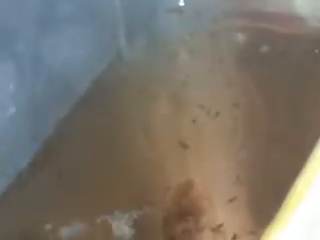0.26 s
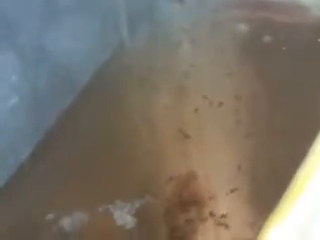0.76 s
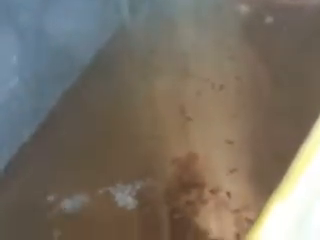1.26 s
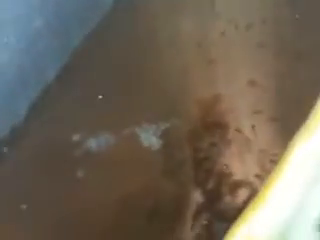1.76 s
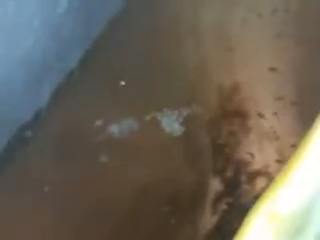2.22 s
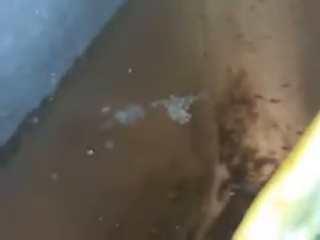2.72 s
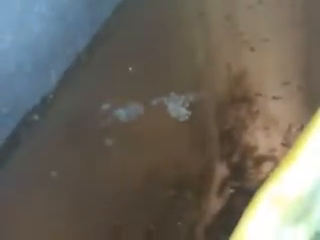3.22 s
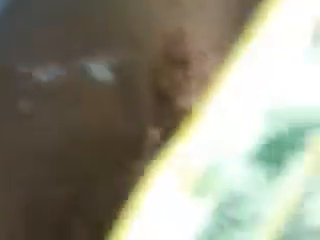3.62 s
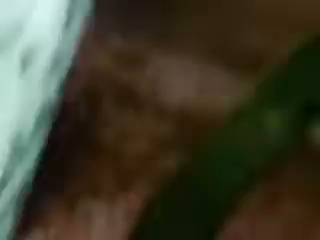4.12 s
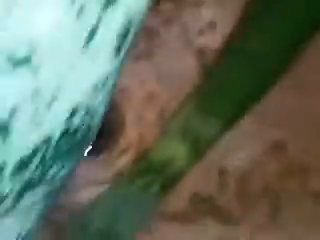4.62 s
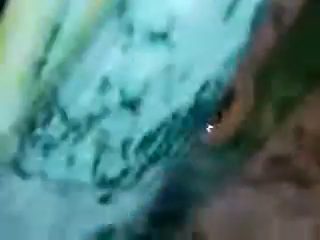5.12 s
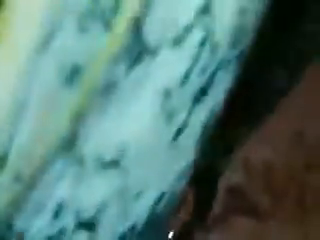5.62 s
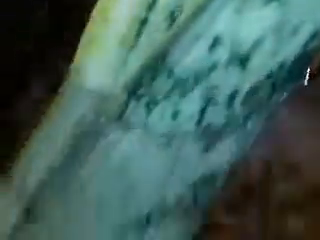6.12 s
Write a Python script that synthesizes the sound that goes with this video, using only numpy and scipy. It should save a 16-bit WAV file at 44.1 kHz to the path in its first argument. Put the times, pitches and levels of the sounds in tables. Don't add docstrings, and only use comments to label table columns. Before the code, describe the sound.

Close to a water tank, a pump hums without pause at a low, buzzy pitch while air rushes through ducts with a thin, fluttering whistle. Faint treble rustles come from a hand on the phone. It turns near four seconds with slight finger scuffs and a soft thud, the hum dipping a little. Later a hollow tub is bumped, rebounding quickly, then a dull double thud follows. A phone microphone with little treble captures it.

```python
import sys
import numpy as np
from scipy import signal
from scipy.fft import irfft, dct, next_fast_len
from scipy.io import wavfile
from scipy.ndimage import uniform_filter1d, map_coordinates

SR = 44100
rng = np.random.default_rng(int(sys.argv[2]) if len(sys.argv) > 2 else 0)


def wav_out(sig):
    wavfile.write(sys.argv[1], SR, np.round(np.clip(np.atleast_2d(sig).T, -1, 1) * 32767).astype(np.int16))


def voltage_ratio(level):
    return 10 ** (np.asarray(level, float) / 20)


N = 280476
TIME_S = np.arange(N) / SR
CONTROL_S = np.arange(0, N + 64, 64) / SR
HOP, GRID = 2048, 536

# (time [s], level of the main hum [dB], turn of the phone [0-1])
PHONE_PATH = [
    (0, -38, 0.1),
    (1.5, -38.5, 0.21),
    (3.4, -37, 0),
    (3.8, -39, 0.32),
    (4.25, -42, 0.99),
    (5.0, -40.5, 0.97),
    (5.6, -39.5, 0.98),
    (6.36, -38.5, 0.64),
]


def curve(table, column):
    rows = np.array(table, float)
    return np.interp(CONTROL_S, rows[:, 0], rows[:, column])


def walk(rate):
    place = CONTROL_S * rate
    whole = place.astype(int)
    part = place - whole
    blend = part ** 2 * (3 - 2 * part)
    levels = rng.standard_normal(whole[-1] + 2)
    return 1.3 * (levels[whole] * (1 - blend) + levels[whole + 1] * blend)


def fader(db):
    return np.interp(TIME_S, CONTROL_S, voltage_ratio(db))


def fading(t, t60):
    return np.exp(-np.log(1000) * t / t60)


def noise(gain):
    size = next_fast_len(N, True)
    hz = np.maximum(np.fft.rfftfreq(size, 1 / SR), 1)
    chance = rng.standard_normal(len(hz)) + 1j * rng.standard_normal(len(hz))
    return irfft(chance * gain(hz) * np.sqrt(size * SR) / 2, size)[:N]


def ring(centre_hz, width):
    x = noise(lambda hz: 1 / (1 + (2 * (hz - centre_hz) / width) ** 2))
    return x / x.std()


def hum(shaft):
    # (multiple of the shaft rate, level [dB rms], change once the phone has turned [dB])
    shaft_orders = [(4, -65.1, -3.0), (5, -55.8, -1.5), (6, -38.6, -2.5), (7, -58.1, 1.5), (8, -52.1, 0.5),
                    (9, -63.5, -5.5), (10, -58.4, 3.5), (11, -57.1, -0.5), (12, -55.3, 0.5),
                    (13, -58.6, -2.0), (14, -52.6, -1.0), (15, -53.0, -1.5), (16, -51.2, -3.0),
                    (17, -54.8, -3.0), (18, -56.7, -1.5), (19, -61.4, -3.0), (20, -59.3, -1.0),
                    (21, -60.9, 1.0), (22, -54.0, -4.0), (23, -59.6, -3.5), (24, -60.2, -3.5),
                    (26, -63.2, -5.5), (27, -61.7, -1.5), (28, -56.2, 0.0), (29, -60.6, -3.0),
                    (32, -59.2, 0.5), (33, -66.9, 1.5), (34, -58.8, -4.5), (36, -62.6, -0.5),
                    (38, -58.9, 0.5), (41, -56.4, -6.5), (42, -65.2, -0.5), (43, -55.0, -5.0),
                    (60, -57.7, -3.0), (62, -57.1, -6.5), (63, -61.2, -9.5), (67, -64.0, 0.5),
                    (69, -62.6, 1.0)]
    main_order, main_order_db, main_phase_rad = 6, -38.6, 2.07
    mains_line_db, weak_orders_db = -69, -73.5
    mains_knock, shaft_knock = (.62, -2.8), (.1, -1.6)
    knock_scatter_rad = 2.2

    main_db = curve(PHONE_PATH, column=1) - main_order_db
    turned = curve(PHONE_PATH, column=2)
    strong = {}
    for order, db, change_db in shaft_orders:
        strong[round(order)] = db + (order != main_order) * change_db * turned

    one_turn = np.exp(1j * shaft)
    spin = one_turn ** 3
    lines = np.sqrt(2) * voltage_ratio(mains_line_db) * np.sin(2 * shaft)
    for order in range(4, 70):
        spin = spin * one_turn
        lead, phase = shaft_knock if order % 2 else mains_knock
        phase = phase + lead * order + knock_scatter_rad * (rng.random() - .5)
        if order == main_order:
            phase = main_phase_rad
        line = np.sqrt(2) * np.imag(spin * np.exp(1j * phase))
        if order == main_order:
            main = line * fader(strong[order] + main_db + 0.16 * walk(0.72))
        elif order in strong:
            lines = lines + line * fader(strong[order] + 0.22 * walk(1.5))
        else:
            weak_db = weak_orders_db - 2.9 * np.log2(order / 26) + 2.3 * rng.standard_normal()
            lines = lines + line * voltage_ratio(weak_db)
    return main + lines


def rush(shaft):
    # (frequency [Hz], level [dB per Hz])
    air_spectrum = [(30, -87), (95, -79.5), (200, -72), (480, -71), (640, -78), (760, -81.5), (880, -79.5),
                    (1120, -77.5), (1280, -80), (1600, -72.5), (2300, -76), (3000, -79), (4150, -87),
                    (4750, -93), (5200, -103)]
    points = np.array(air_spectrum, float)
    turned, swell = curve(PHONE_PATH, column=2), walk(1.2)
    low_db, high_db = -1.5 * turned, 0.75 * turned
    out = 0
    for centre in np.arange(4, 13, .5):

        def band_gain(hz):
            level_db = np.interp(np.log(hz), np.log(points[:, 0]), points[:, 1])
            return voltage_ratio(level_db) * np.cos(np.pi * np.clip(np.log2(hz) - centre, -.5, .5))

        place_db = low_db if centre < 9.4 else high_db
        flicker_db = 3.0 if centre < 6.8 else .6
        out = out + noise(band_gain) * fader(place_db + 0.23 * swell + flicker_db * walk(5))
    return out * (1 + 0.063 * np.cos(2 * shaft))


def drifting(x):
    slip = np.cumsum(np.interp(TIME_S, CONTROL_S, .008 * walk(2.5)))
    return map_coordinates(x, [np.arange(N) + slip], order=1, mode="mirror")


def steadied(x):
    size = np.sqrt(uniform_filter1d(x ** 2, size=SR // 50)) + 0.19
    x = x / size ** .85
    return x / x.std()


def gusts(column):
    # (time of the crest [s], rise of the lower tone [dB], rise of the upper tone [dB])
    gust_crests = [(.12, 6, 4), (.26, 12, 5.9), (.65, 3.8, 2), (.92, 5.3, 9.9), (1.25, 9.4, 6),
                   (1.35, 7.1, 11.4), (1.45, 6, 7.6), (1.68, 4.1, 1.3333), (1.92, 5.6, 2), (2.1, 5.6, 1.8),
                   (2.3, 7.5, 5.6), (2.42, 7.1, 6.5), (2.8, 6.4, 9.9), (2.95, 1.9, 6.1), (3.34, 8.7, 6),
                   (3.75, 5.7, 4.5), (3.9, 10, 7.5), (4.201, 7.4, 6), (4.58, 0.6, 1.8), (4.96, 7.8, 5),
                   (5.2, 1.5, 4), (6.36, 4.3, 7.2)]
    rise_s, fall_s = 0.037, 0.05
    out = 0
    for crest, db in np.array(gust_crests)[:, [0, column]]:
        t = CONTROL_S - crest
        distance = np.where(t < 0, -t / rise_s, t / fall_s)
        out = np.maximum(out, db * np.exp(-distance ** 2))
    return out


def ducts(shaft):
    # (frequency [Hz], width [Hz], level [dB rms], change once the phone has turned [dB])
    duct_modes = [(361, 76, -59.5, -3.5), (941, 120, -56, 4), (1041, 120, -52.5, -4.5),
                  (1544, 84, -56.5, 2.5), (1760, 230, -64, 12.5), (1877, 22, -54, -1),
                  (2065, 100, -53.5, 3), (2438, 160, -57.5, 4), (2608, 120, -52, -3),
                  (2810, 360, -49, -12.5)]
    # (frequency [Hz], width [Hz], level [dB])
    whistle_tones = [
        (1797, 9, -4.5),
        (1840, 20, -5),
    ]
    whistle_rest_db = -49.5
    turned = curve(PHONE_PATH, column=2)
    out = 0
    for hz, width, db, turned_db in duct_modes:
        out = out + drifting(ring(hz, width)) * fader(db + turned_db * turned + 1.5 * walk(3.0))
    for k, (hz, width, db) in enumerate(whistle_tones):
        out = out + steadied(ring(hz, width)) * fader(db + whistle_rest_db + gusts(column=k + 1))
    return out * (1 + 0.14 * np.cos(2 * shaft))


def bump():
    # (time [s], level [dB])
    tub_blows = [
        (5.647, -12.5),
        (5.662, -17),
        (5.673, -14.5),
        (5.703, -20),
        (5.734, -26),
        (5.771, -29),
        (5.798, -28),
    ]
    # (frequency [Hz], level [dB], time to fade by 60 dB [s])
    tub_modes = [
        (273, -1.5, 0.052),
        (305, -8.5, 0.025),
    ]
    # (frequency [Hz], level [dB], time to fade by 60 dB [s])
    tub_air = (258, -34.5, 0.8)
    out, t = np.zeros(N), np.arange(SR // 2) / SR
    walls = sum(voltage_ratio(db) * np.sin(2 * np.pi * hz * t) * fading(t, t60) for hz, db, t60 in tub_modes)
    for start, db in tub_blows:
        out[int(start * SR):][:len(t)] += voltage_ratio(db) * walls * (1 - np.exp(-t / 0.0038))
    hz, db, t60 = tub_air
    air = voltage_ratio(db) * np.sin(2 * np.pi * hz * t) * fading(t, t60) * (1 - np.exp(-t / .04))
    out[int(tub_blows[0][0] * SR):][:len(t)] += air
    return signal.sosfilt(signal.butter(2, [230, 400], "band", fs=SR, output="sos"), out)


def rubs(centre_hz):
    # (time [s], length [s], level over the resting rustle [dB], colour [Hz])
    hand_rubs = [(.08, .04, 9, 5630), (0.078, .04, 10, 7120), (0.184, .03, 12, 6160), (.18, .03, 9.5, 6980),
                 (0.278, .04, 6, 5100), (0.322, .02, 9, 6930), (.41, .04, 6, 5100), (0.547, .28, 8, 5320),
                 (.6, .04, 8.5, 5890), (.6, .18, 8, 6650), (.88, .08, 7.5, 6600), (.92, .1, 8.5, 5370),
                 (1.017, .04, 12, 6400), (1.037, .13, 10.5, 5440), (1.2, .18, 9.5, 5240),
                 (1.201, .15, 9, 6180), (1.448, .33, 11.5, 5420), (1.495, .22, 11.5, 6470),
                 (1.809, .03, 9.5, 5600), (1.983, .1, 8, 5500), (2.04, .2, 9, 6265), (2.144, .04, 12, 6850),
                 (2.126, .36, 9, 5340), (2.343, .33, 9, 5950), (2.5, .08, 11, 6580), (2.5, .22, 9.5, 5350),
                 (2.738, .02, 7.5, 6050), (2.831, .08, 7, 5576), (2.986, 0.16, 9, 6280),
                 (2.997, 0.17, 9.5, 5420), (3.335, .02, 11.5, 6500), (3.385, .02, 7, 5750),
                 (3.573, .04, 13.5, 5480), (3.67, .12, 6, 5110), (3.758, .08, 8.5, 6250),
                 (3.94, .03, 7, 6300), (3.972, .06, 10, 5300), (4.13, .06, 12.5, 6640),
                 (4.135, .09, 9.5, 5440), (4.411, .02, 10, 6200), (4.64, .04, 6, 4960),
                 (5.248, .07, 10, 6450), (5.25, .05, 9, 5500), (5.625, .08, 9, 5414),
                 (5.67, .07, 8.5, 6430), (5.94, .03, 3.5, 4940), (6.08, .04, 9, 5450),
                 (6.077, .09, 7.5, 6090), (6.209, .03, 8, 5780), (6.308, .05, 9, 6100)]
    edge_s, spread_hz, body_hz, body_share = .025, 520, 4760, .65
    body = body_share * np.exp(-((centre_hz - body_hz) / spread_hz) ** 2)
    lift_db = 0
    for start, length, db, hz in hand_rubs:
        inside_s = np.minimum(CONTROL_S - start, start + length - CONTROL_S)
        shape = np.clip(1 + inside_s / edge_s, 0, 1)
        colour = np.exp(-((centre_hz - hz) / spread_hz) ** 2)
        lift_db = np.maximum(lift_db, db * shape * max(colour, body))
    return lift_db


def rustle():
    # (time [s], level [dB], rise [s], time to fade by 60 dB [s], colour [Hz])
    finger_ticks = [
        (4.145, -36, 0.0023, 0.13, 2360),
        (4.205, -39, .002, 0.076, 2000),
        (5.26, -48.5, 0.022, 0.14, 4200),
    ]
    out = 0
    for centre in np.arange(4500, 7500, 400):
        band = noise(lambda hz: voltage_ratio(-92) * np.cos(np.pi / 2 * np.clip((hz - centre) / 400, -1, 1)))
        out = out + band * fader(-5.5 * np.log2(centre / 5500) + rubs(centre))
    out = out * fader(-6.5 + 0.5 * walk(14))
    for start, db, rise, t60, hz in finger_ticks:
        t = TIME_S - start
        shape = np.exp(np.where(t < 0, t / rise, -np.log(1000) * t / t60))
        out += ring(hz, 0.91 * hz) * voltage_ratio(db) * shape
    return out


def thud():
    # (time [s], level [dB], frequency [Hz], time to fade by 60 dB [s])
    table_thuds = [
        (3.83, -47, 105, .2),
        (5.953, -46, 88, .12),
        (5.995, -43, 96, .15),
    ]
    out = 0
    for start, db, hz, t60 in table_thuds:
        t = np.maximum(TIME_S - start, 0)
        out = out + voltage_ratio(db) * np.sin(2 * np.pi * hz * t) * (1 - np.exp(-t * hz)) * fading(t, t60)
    return out


def scene():
    shaft = 2 * np.pi * 25.028 * TIME_S + 1.1
    mono = hum(shaft) + rush(shaft) + ducts(shaft) + bump() + rustle() + thud()
    return np.array([mono, mono])


def rounded(coef, step):
    return np.sign(coef) * np.floor(abs(coef) / step + .4) * step


def lapped_inverse(coef, window):
    p, q = np.split(dct(coef, type=4, norm="ortho"), 2, axis=1)
    halves = np.c_[q, -q[:, ::-1], -p[:, ::-1], -p] * window
    first = np.r_[halves[:, :HOP].ravel(), np.zeros(HOP)]
    second = np.r_[np.zeros(HOP), halves[:, HOP:].ravel()]
    return (first + second)[HOP - GRID:][:N]


def slice_rounding(x):
    split_times = [1.08, 1.22, 2.195, 2.334, 2.473, 2.52, 2.845, 3.17, 3.634, 3.727, 3.867, 4.006, 4.47,
                   6.33]
    # (frequency [Hz], level over the rounding step [dB])
    channel_mismatch = [(60, -16), (200, -17.5), (350, -14.5), (650, -10), (1450, -10), (1700, -15.5),
                        (2800, -14.5), (3300, -12), (4200, -11.5), (5000, -14.5), (7000, -22)]
    coarse_hz, coarser_hz, rebuilt_hz, top_hz = 4190, 4780, 5150, 7180
    step_db, side_db, split_db = -35.5, -41, -45

    window = signal.windows.kaiser_bessel_derived(2 * HOP, 4 * np.pi)
    padded = np.pad(x, (HOP - GRID, 2 * HOP))
    frames = np.lib.stride_tricks.sliding_window_view(padded, 2 * HOP)[::HOP] * window
    a, b, c, d = np.split(frames, 4, axis=1)
    coef = dct(np.c_[-c[:, ::-1] - d, a - b[:, ::-1]], type=4, norm="ortho")
    hz = (np.arange(HOP) + .5) * SR / 2 / HOP

    steps_db = step_db - 2.8 * (hz < coarse_hz)
    steps_db = steps_db - 7 * np.clip((coarse_hz - 600 - hz) / 1500, 0, 1)
    steps_db = steps_db + 0.19 * (hz > coarser_hz) * (hz < rebuilt_hz)
    steps_db = steps_db - 2.7 * np.clip((hz - rebuilt_hz) / 2000, 0, 1)
    band_chance = rng.standard_normal((len(coef), HOP // 32))
    step = voltage_ratio(steps_db + 1.3 * np.repeat(band_chance, repeats=32, axis=1))
    coef = rounded(coef, step) * (hz < top_hz)

    high = lapped_inverse(coef * (hz >= rebuilt_hz), window)
    top = np.imag(signal.hilbert(high, next_fast_len(N))[:N])
    mid = lapped_inverse(coef * (hz < rebuilt_hz), window) + top

    points = np.array(channel_mismatch, float)
    mismatch_db = np.interp(np.log(hz), np.log(points[:, 0]), points[:, 1])
    mismatch = voltage_ratio(mismatch_db + .8 * rng.standard_normal((len(coef), 1)))
    chance = rng.standard_normal(coef.shape)
    side = voltage_ratio(side_db) * rounded(mismatch * chance, 0.93) * (hz < top_hz)
    side += coef * (hz > coarser_hz) * (abs(chance) > 1.4) * 0.65
    split = np.round((np.array(split_times) * SR - GRID) / HOP).astype(int)
    treble_tilt_db = -1.0 * np.log2(np.maximum(hz, 500) / 1500)
    bass_tilt_db = 2.5 * np.log2(np.minimum(hz, 300) / 300)
    side[split] = voltage_ratio(split_db + treble_tilt_db + bass_tilt_db) * chance[split] * (coef[split] != 0)
    return mid, lapped_inverse(side, window)


def low_pass(x):
    return signal.sosfilt(signal.butter(12, 7060, fs=SR, output="sos"), x)


def record(dry):
    mono = signal.sosfilt(signal.butter(1, 50, "high", fs=SR, output="sos"), dry.mean(axis=0))
    mid, side = slice_rounding(mono)
    mix = mid + side * np.array([[1], [-1]]) - .0007
    return low_pass(mix)


dry = scene()
out = record(dry)
wav_out(out)
```